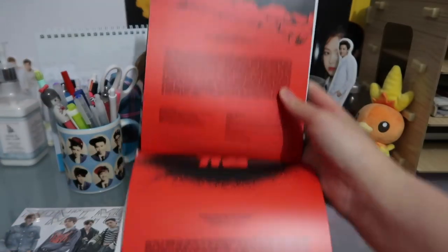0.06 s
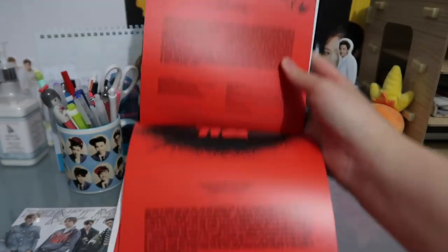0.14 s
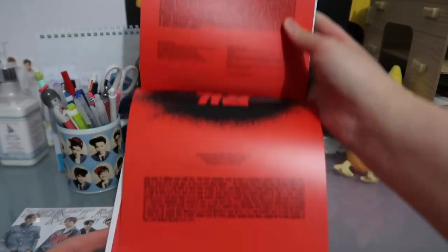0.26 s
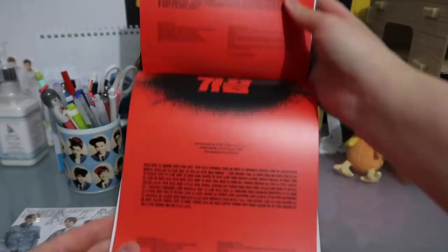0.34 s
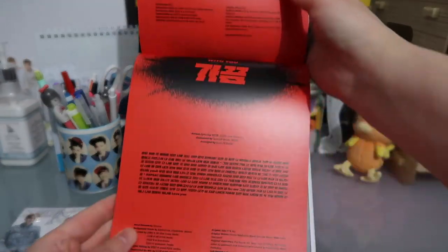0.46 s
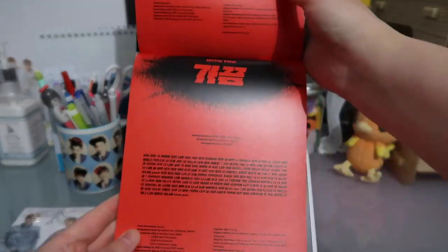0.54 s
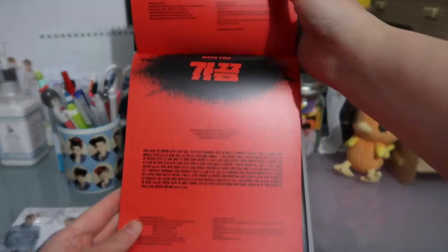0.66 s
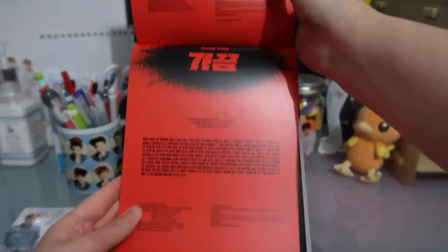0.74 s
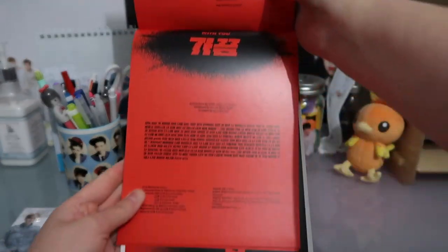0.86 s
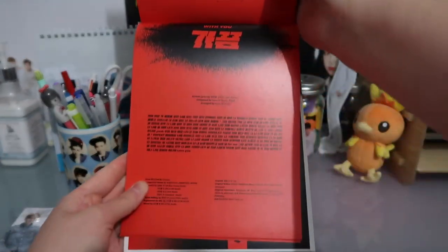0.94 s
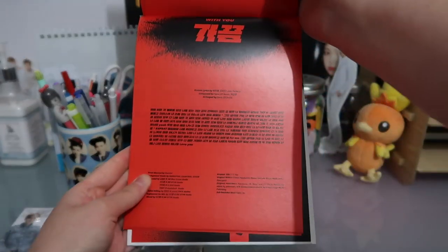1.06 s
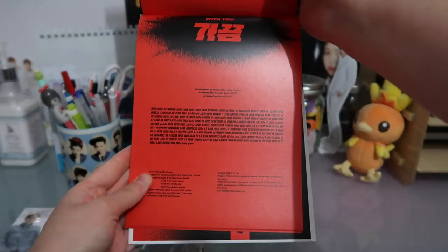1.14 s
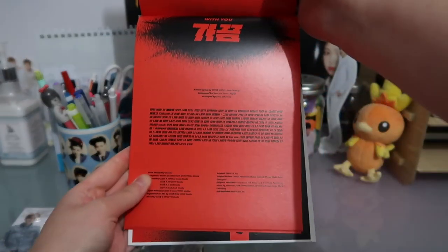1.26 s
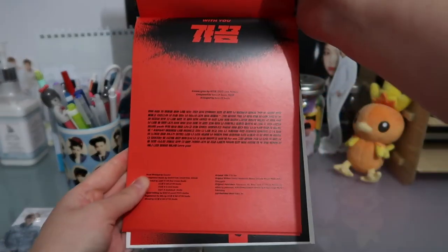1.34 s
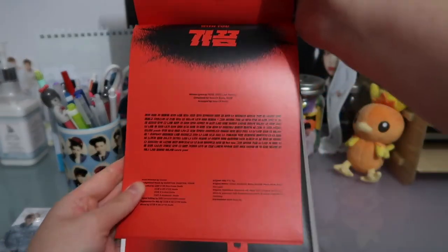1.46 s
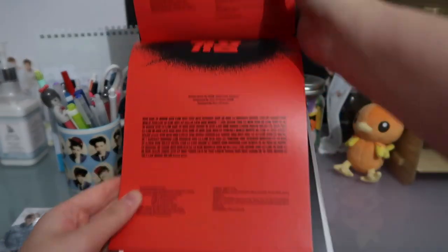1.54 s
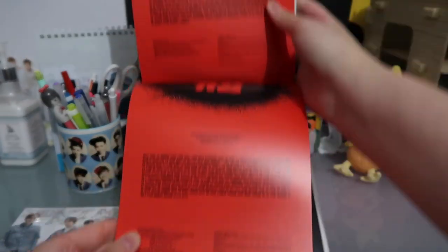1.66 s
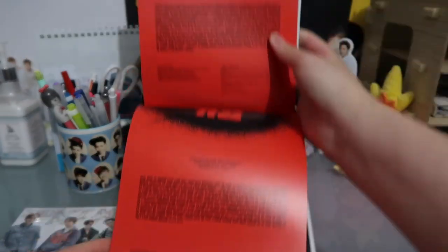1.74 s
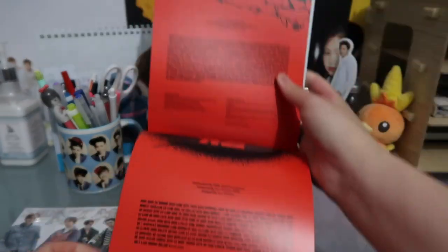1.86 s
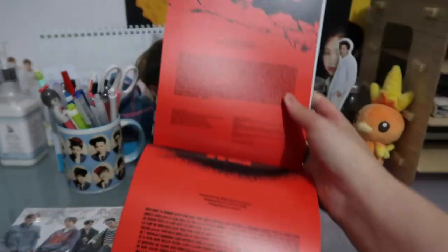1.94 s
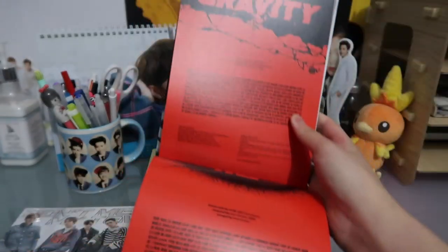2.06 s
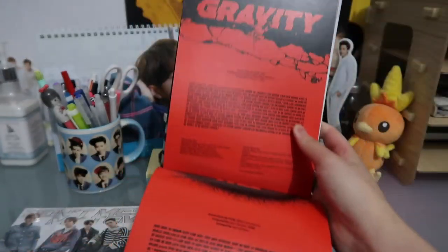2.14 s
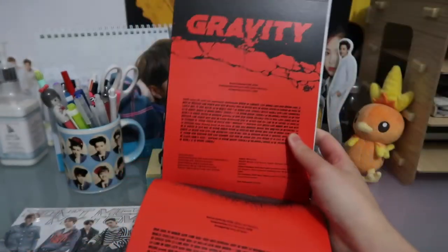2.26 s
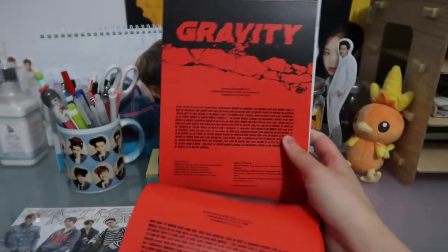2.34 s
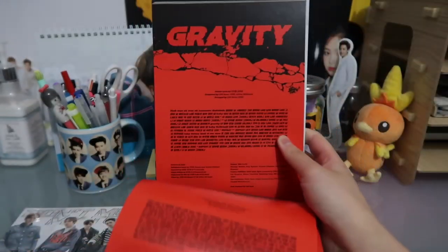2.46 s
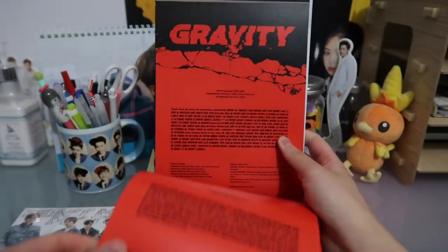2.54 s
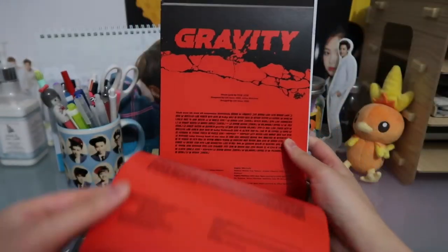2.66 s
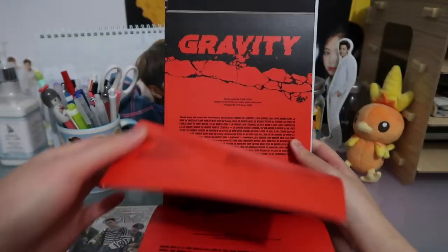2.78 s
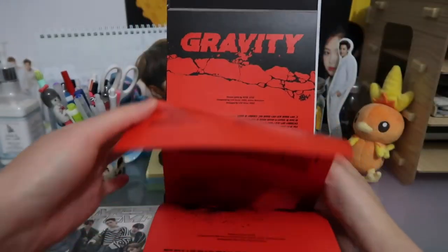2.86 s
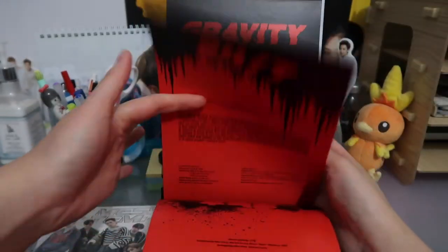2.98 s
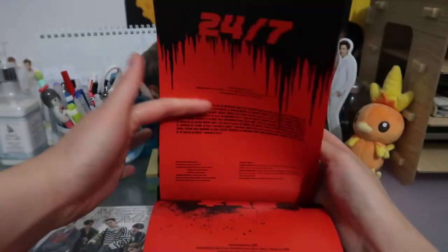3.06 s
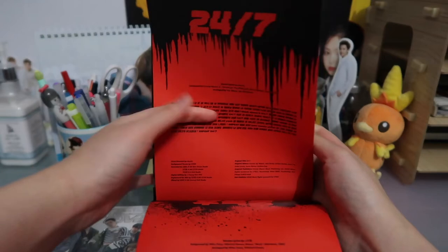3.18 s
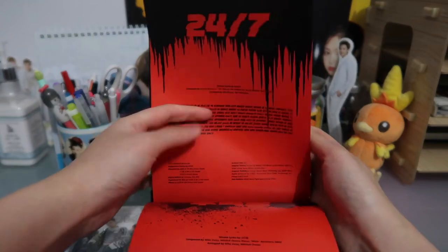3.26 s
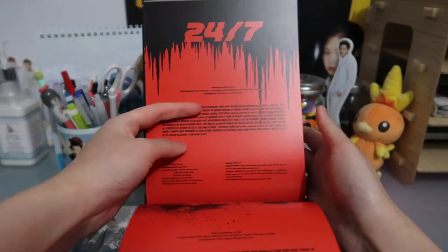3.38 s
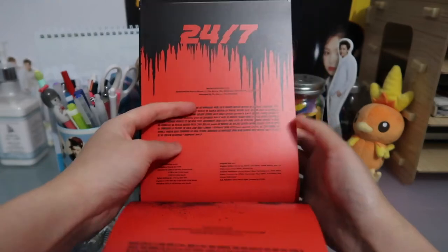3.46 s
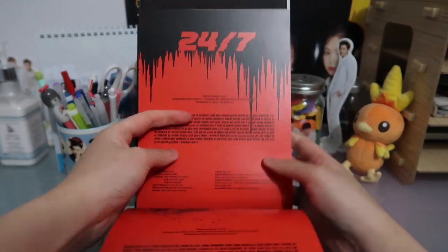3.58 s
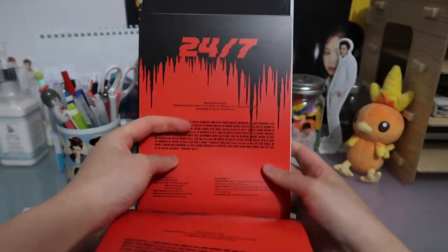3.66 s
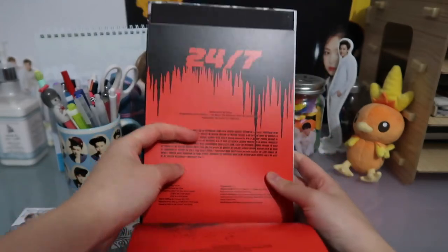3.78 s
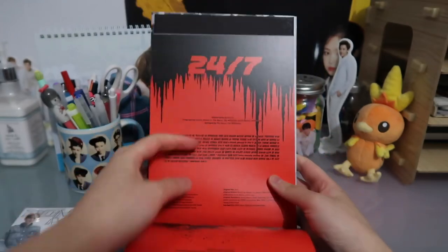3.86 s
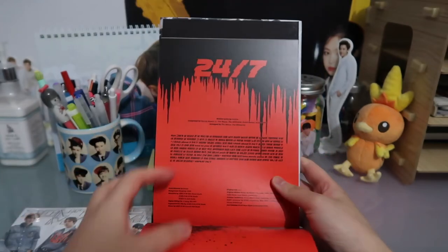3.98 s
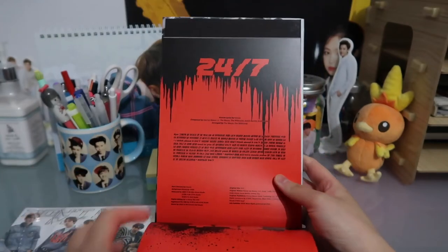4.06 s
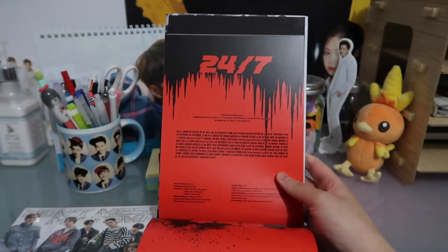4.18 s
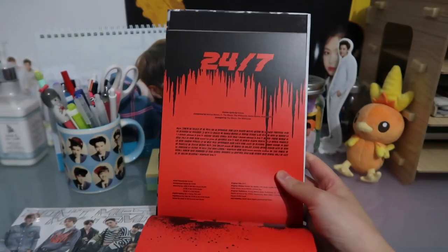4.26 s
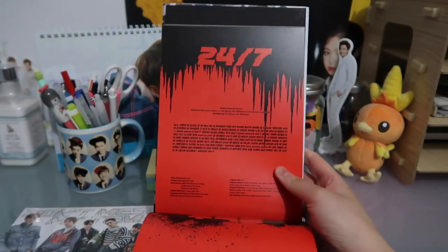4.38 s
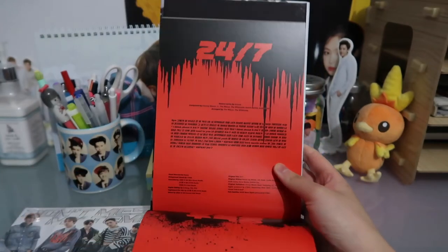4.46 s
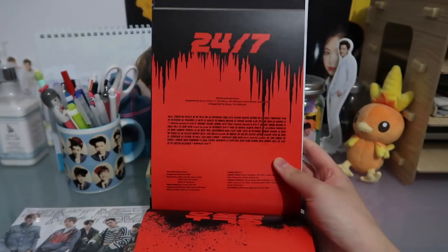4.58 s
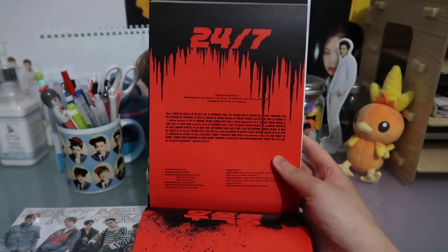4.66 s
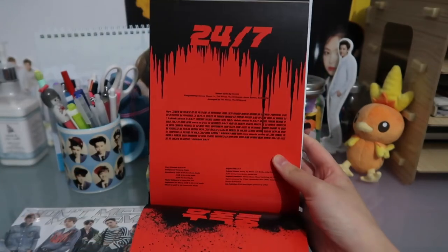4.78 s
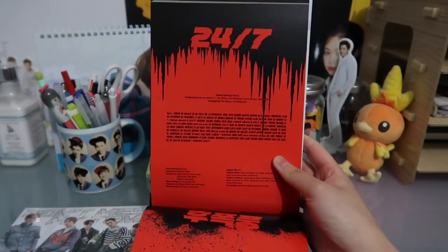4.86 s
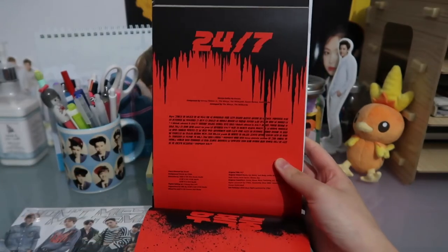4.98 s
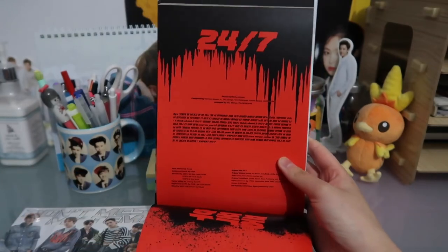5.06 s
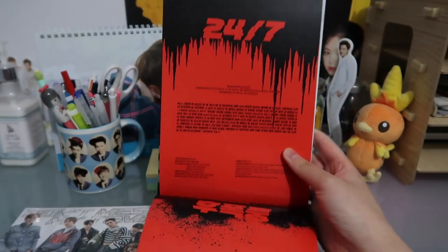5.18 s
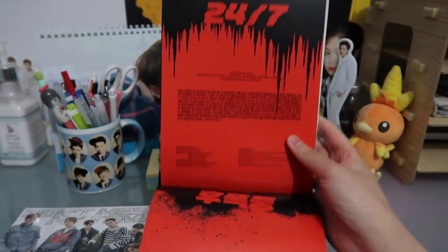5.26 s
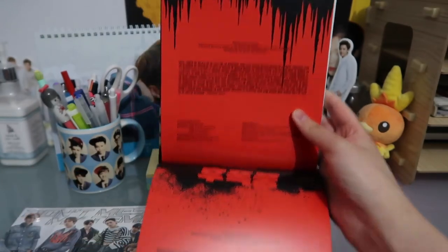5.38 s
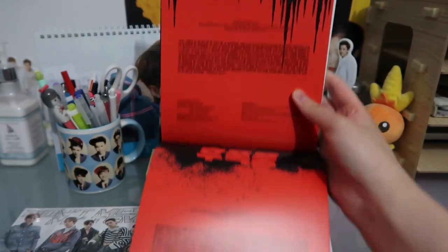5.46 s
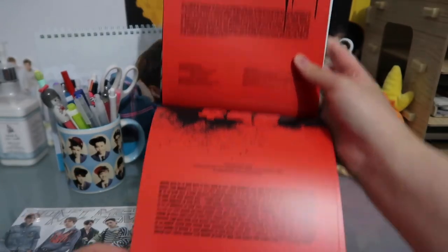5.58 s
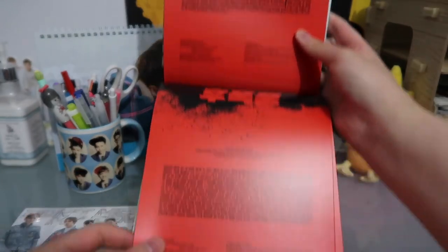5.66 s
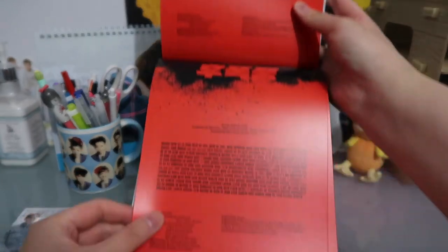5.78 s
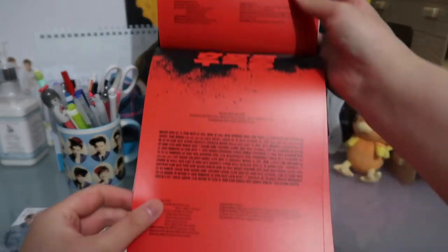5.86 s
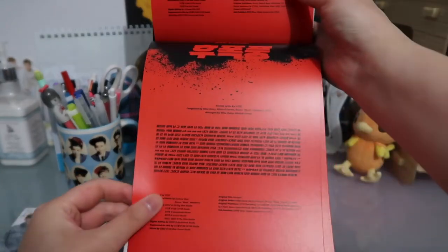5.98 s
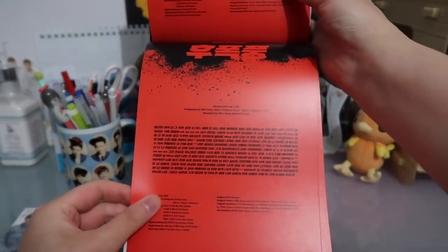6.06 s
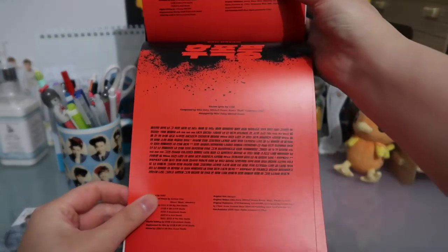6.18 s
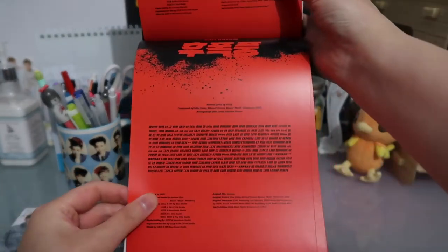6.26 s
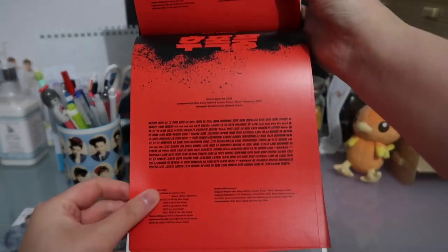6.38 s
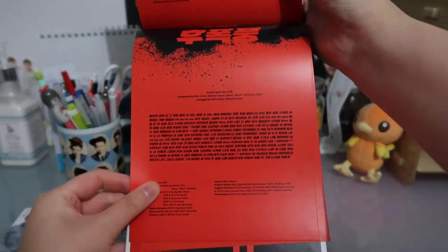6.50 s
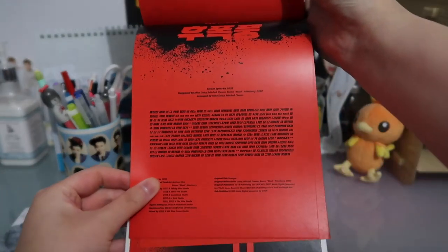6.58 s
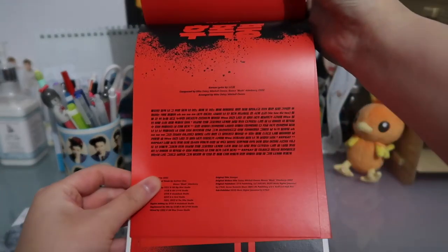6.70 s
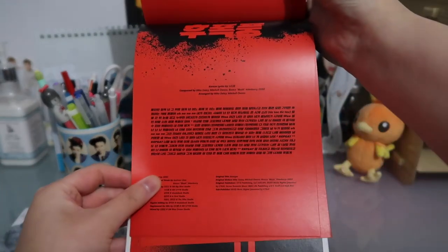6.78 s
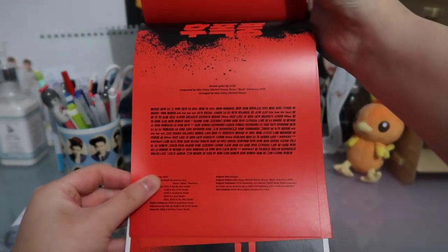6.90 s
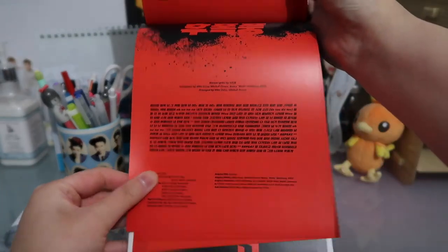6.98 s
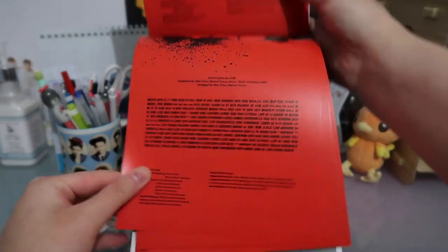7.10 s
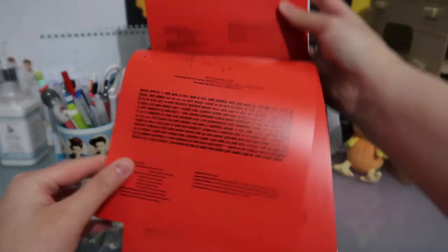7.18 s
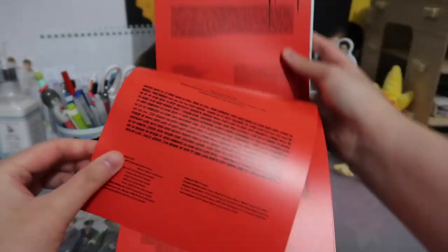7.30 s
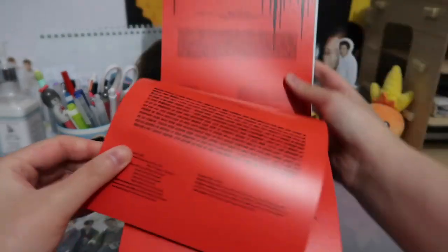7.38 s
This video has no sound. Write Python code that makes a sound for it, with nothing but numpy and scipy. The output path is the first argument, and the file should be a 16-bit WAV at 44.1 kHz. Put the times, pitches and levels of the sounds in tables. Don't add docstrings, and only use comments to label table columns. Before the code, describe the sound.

Close stereo microphones in a small quiet room with faint hiss and hum. A stiff glossy booklet is tilted with light taps and finger scrapes, then rests. Pages rustle and snap in a busy flurry, a loud edge tap on the desk follows with smaller settling taps, then near silence, a soft shift, another pause and a final crisp page turn.

```python
import sys
import numpy as np
from scipy import signal
from scipy.fft import rfft, irfft
from scipy.io import wavfile
from scipy.ndimage import uniform_filter1d

SR = 44100
rng = np.random.default_rng(int(sys.argv[2]) if len(sys.argv) > 2 else 0)


def attenuation_scalar(level_db):
    decades = np.asarray(level_db, float) / 20
    return 10 ** decades


def to_wav(s):
    ch = np.atleast_2d(s).T
    pcm = np.round(np.clip(ch, -1, 1) * 32767)
    wavfile.write(sys.argv[1], SR, pcm.astype(np.int16))


N = 328104

# (frequency [Hz], density [dB per Hz])
HISS_SPECTRUM = [(12, -46), (20, -18), (44, -3), (70, -16.5), (101, -2.5), (126, -8), (289, -7), (439, -10),
                 (478, -13.5), (649, -15), (725, -14.5), (3170, -22), (13100, -38.5), (13700, -62)]
# (frequency [Hz], left-right likeness [-1 to 1])
HISS_LIKENESS = [(60, 1), (150, 0.69), (380, -0.23), (950, -0.041), (2380, 0.048), (5980, -0.17),
                 (15000, 0.57)]
# (frequency [Hz], level [dB], phase by which left leads [rad])
HUM_TONES = [(50, -71, 0), (100, -67, 0), (13000, -77, 2.15), (13025, -77.5, 2.15), (12975, -88, 2.1),
             (13050, -87, 2)]
# (time [s], length [s], level [dB])
PUFFS = [(.005, .1, -49), (0.14, 0.063, -52), (0.225, 0.098, -51.5), (1.547, 0.032, -44),
         (1.583, 0.16, -54.5), (2.164, 0.16, -53), (2.329, 0.067, -44.5), (2.481, 0.071, -43.5),
         (2.59, .12, -49), (2.772, 0.07, -49.5), (2.92, 0.15, -47), (3.081, 0.097, -45),
         (3.142, 0.063, -47), (3.29, 0.063, -49), (3.764, 0.056, -47), (3.991, 0.044, -45.5),
         (4.133, .2, -56), (5.54, 0.44, -59), (3.348, 0.19, -54), (7.079, 0.054, -49), (7.198, 0.15, -52.5)]
# (frequency [Hz], level [dB], decay T60 [s])
DESK_MODES = [(266, 6, 0.12), (370, -8, 0.21), (503.4, 1.5, 0.084), (538, 2, 0.095), (602.6, -4, 0.062),
              (924, 2, 0.03), (1167, -1, 0.043), (1400, -15, 0.02), (1717, -9.5, 0.072),
              (2160, -18.5, 0.11), (2745, -20, 0.082)]
# (frequency [Hz], level [dB])
CARD_SPECTRUM = [(200, -20), (500, -6), (1100, 3), (2000, -11.5), (4000, -20.5), (8000, -37), (15000, -44)]
# (frequency [Hz], decay T60 [s])
CARD_T60 = [(200, 0.064), (600, 0.15), (1500, 0.096), (4000, 0.064), (10000, 0.049)]
# (time [s], peak [dB], thump [dB], snap [dB])
TAPS = [(0.015, -22, -11.5, -22), (0.081, -28.5, -11.5, -24), (0.137, -35, 5, -8),
        (0.162, -20, -11.5, -18.5), (0.226, -41, -15, -31), (0.247, -34, -16, -38),
        (0.315, -34.5, -19, -34), (0.59, -42.5, -15, -14), (0.646, -42.5, -13, -23), (3.76, -9.5, -15, -16),
        (3.811, -22, -12.5, -19), (3.846, -25.5, -10, -32), (3.855, -25.5, -10.5, -23.5),
        (4.001, -23.5, -15, -24), (4.048, -34.5, -13, -19), (4.142, -29.5, -11, -22), (4.158, -32, -8, -30),
        (4.2, -42, -17, -42), (4.275, -33.5, -7, -21.5), (4.386, -33.5, -7, -23), (4.452, -30.5, 1, -16),
        (4.523, -35, -23, -29), (4.574, -44.5, -25, -33), (4.62, -42.5, -29, -40), (4.682, -43, -28, -41),
        (4.76, -21.5, -17, -17.5), (5.039, -38, -27, -44), (5.146, -32, -13.5, -16),
        (5.585, -43.5, -1, -27)]
# (time [s], peak [dB], thump [dB], snap [dB])
SNAPS = [(1.553, -31.5, -45, -40), (1.597, -31, -44, -5), (1.649, -33, -23, -11), (1.884, -28.5, -16, -24),
         (1.971, -29, -26, -18), (2.169, -26.5, -5, -9), (2.203, -34.5, -17, -37), (2.242, -34, -17, -29),
         (2.35, -34.5, -11, -14), (2.496, -22, -10.5, -16.5), (2.601, -20.5, -19.5, -26),
         (2.624, -27, -16, -18), (2.669, -23, -16, -14.5), (2.774, -33.5, -23, -24),
         (2.799, -23.5, -23, -15), (2.965, -23, -7.5, -1), (3.001, -22.5, -19, -4), (3.027, -33, -13, -3),
         (3.111, -22.5, -16, -22), (3.132, -27.5, -11, -20), (3.303, -26.5, -15, -35),
         (3.344, -38, -20, -16), (3.389, -33, -22, -4), (5.762, -30, -7.5, -10), (7.165, -31, -30, -10),
         (7.193, -34, 1, -1.5)]
# (time [s], length [s], effort [dB], hiss
# [dB], air pocket [Hz])
SLIDES = [(0.017, 0.11, -59, 0.5, 5830), (0.207, 0.088, -60, 5, 1930), (0.31, 0.09, -59.5, -0.5, 1250),
          (0.392, .14, -52.5, -1.5, 2960), (0.498, 0.15, -61.5, -6, 1520), (1.152, 0.12, -59, -36, 1310),
          (3.388, 0.079, -53.5, -1, 2660), (4.11, 0.26, -71, 4.5, 8100), (4.516, 0.053, -55, -1, 1120),
          (4.592, 0.12, -69, 3, 1240), (5.626, 0.088, -55.5, 3, 1920), (5.682, 0.071, -56, 0, 3430),
          (5.749, 0.04, -49, -7, 1320), (5.832, .07, -66.5, 1, 1900),
          (1.544, 0.12, -52.5, -6.5, 1310), (1.639, 0.077, -48.5, -16, 1780), (1.687, 0.16, -63.5, -5, 1620),
         (1.873, .1, -54, -6.5, 1350), (1.952, 0.051, -50, -2, 1400), (2.04, 0.14, -52.5, -1, 1750),
         (2.136, 0.094, -49.5, 0.5, 1580), (2.232, 0.043, -46.5, -7.5, 3190),
         (2.269, 0.088, -52.5, -7, 1640), (2.338, 0.075, -50, -4, 1560), (2.38, 0.26, -52, -6, 1450),
         (2.59, 0.086, -50, -8, 1250), (2.79, 0.087, -47, -4.5, 1400), (2.861, 0.23, -42, -8, 1550),
         (3.025, 0.11, -53.5, 1, 1450), (3.11, 0.1, -48, -19, 2850), (3.17, 0.12, -50.5, -9, 3940),
         (3.296, 0.13, -53.5, -23, 1430), (7.062, 0.069, -52, 1, 6400), (7.099, 0.072, -47, 0.5, 6460),
         (7.184, 0.04, -52, 0, 5600), (7.208, .08, -43.5, -9, 3660), (7.242, 0.17, -50.5, -3.5, 2980),
         (7.32, 0.19, -54, -6.5, 2820)]
# (frequency [Hz], density [dB per Hz])
SLIDE_SPECTRUM = [(530, -14), (900, -1.5), (1290, -2), (1930, -4), (2890, -7.5), (3180, -12), (3500, -9),
                  (5370, -22), (11800, -32.5), (15500, -48)]
# (frequency [Hz], bandwidth [Hz], level [dB])
SHEET_MODES = [(270, 50, 12.5), (503, 240, 3), (1080, 180, 14.5), (1230, 67, 0), (1750, 50, 8.5)]
# (time [s], peak [dB])
TICKS = [
    (2.774, -37),
    (3.673, -31.5),
]
# (frequency [Hz], left-right likeness [clipped to -1 to 1])
NEAR_LIKENESS = [(100, 1), (600, 1), (1500, 1), (3000, .88), (7000, .5), (14000, -2.1)]


def read_curve(points, hz):
    f, value = np.transpose(points)
    return np.interp(np.log(hz + 1), np.log(f + 1), value)


def evened(x):
    return x / np.sqrt(np.mean(x ** 2) + 1e-20)


def add(mix, s, sound):
    part = mix[round(s * SR):][:len(sound)]
    part += sound[:len(part)]


def coloured(x, points):
    gain = attenuation_scalar(read_curve(points, np.fft.rfftfreq(len(x), 1 / SR)))
    return irfft(rfft(x) * gain, len(x))


def resonate(x, hz, width):
    turn = np.exp(2j * np.pi * np.cumsum(hz * np.ones(len(x))) / SR)
    r = np.exp(-np.pi * width / SR)
    smoothed = signal.lfilter([1 - r], [1, -r], x / turn + 1e-18)
    return 2 * (turn * smoothed).real


def grains(per_s, spread_db):
    clumps = evened(uniform_filter1d(uniform_filter1d(rng.standard_normal(N), 300), 300))
    size_db = spread_db * np.minimum(rng.exponential(1, N), 5)
    size = attenuation_scalar(size_db) * rng.choice([-1, 1], N)
    catches = evened(size * (rng.random(N) < per_s / SR))
    noise = 0.52 * rng.standard_normal(N)
    return evened((catches + noise) * attenuation_scalar(1.44 * clumps))


def arch(length, db):
    u = np.arange(0, 1, 1 / (SR * length))
    return attenuation_scalar(db) * np.sin(np.pi * u ** 0.8)


def floor():
    frames, hz = N // 512 + 6, np.fft.rfftfreq(2048, 1 / SR)
    a, b, c, d, patches = rng.standard_normal((frames, len(hz), 5)).T
    patches = evened(uniform_filter1d(uniform_filter1d(patches, 24, 0), 6, 1))
    same = read_curve(HISS_LIKENESS, hz)[:, None]
    left = a + 1j * b
    right = same * left + np.sqrt(1 - same ** 2) * (c + 1j * d)
    level_db = read_curve(HISS_SPECTRUM, hz)[:, None] + 0.3 * patches
    z = np.array([left, right]) * attenuation_scalar(level_db) / np.sqrt((1 + same) / 2)
    hiss = signal.istft(z, nperseg=2048, noverlap=1536)[1][:, :N]
    t = np.arange(N) / SR
    hum = np.zeros((2, N))
    for f, db, lead in HUM_TONES:
        hum += np.sqrt(2) * attenuation_scalar(db) * np.sin(2 * np.pi * f * t + np.array([[lead], [0]]))
    return attenuation_scalar(-56 - 0.47) * hiss / np.std(hiss.mean(0)) + attenuation_scalar(0.3) * hum


def puffs():
    air = coloured(grains(300, 2.65),
                   [(30, -41), (70, 0), (150, -0.5), (300, -8), (500, -3.5), (1000, -78)])
    air = evened(air) + 0.71 * evened(resonate(air, 293, 30))
    push = np.zeros(N)
    for s, length, db in PUFFS:
        add(push, s, arch(length, db))
    return attenuation_scalar(-1.0) * push * air


def knock(peak_db, thump_db, snap_db):
    modes, blow_ms = 100, 2.885
    t = np.arange(3000, dtype=np.float32)[:, None] / SR
    draw = rng.random((modes, 3))
    card_hz = 250 * 56 ** (((np.arange(modes) + draw[:, 0]) / modes) ** 0.7)
    desk_hz, desk_db, desk_t60 = np.transpose(DESK_MODES)
    count = len(desk_hz)
    hz = np.r_[desk_hz * (0.98 + 0.04 * draw[:count, 1]), card_hz]
    card_db = read_curve(CARD_SPECTRUM, card_hz) - 9 - 6 * draw[:, 1]
    db = np.r_[desk_db - 4 * draw[:count, 0], card_db]
    colour = [(300, thump_db + 9), (530, 0.45 * thump_db + 5), (1100, 0), (4000, snap_db + 27)]
    db += read_curve(colour, hz)
    t60 = 0.98 * np.r_[desk_t60, read_curve(CARD_T60, card_hz)]
    phase = 2 * np.pi * np.resize(draw[:, 2], len(hz))
    onset = 1 - np.exp(-t * hz / 0.39)
    rings = (attenuation_scalar(db - 60 * t / t60) * np.sin(2 * np.pi * hz * t + phase) * onset).sum(1)
    rings *= 1 + attenuation_scalar(4 - 60 * t[:, 0] / 0.012)
    contacts = np.zeros(900)
    contact_s = draw[:4, 2] * draw[:4, 1] * blow_ms / 1000
    contacts[(contact_s * SR).astype(int)] = 0.44 * (1 - draw[:4, 0])
    contacts[0] = 1
    sound = signal.fftconvolve(rings, contacts)
    return attenuation_scalar(peak_db) * sound / abs(sound).max()


def smoothed_power(x):
    return abs(uniform_filter1d(x, 130))


def efforts():
    t = np.arange(6000) / SR
    shake_t60, shake_hiss_db, shake_hz = 0.24, -16, 1250
    parts = []
    for s, length, db, hiss_db, hz in SLIDES:
        parts.append((s, arch(length, db), hiss_db, hz, 1))
    for blows, shake_db in (SNAPS, -29), (TAPS, -33.5):
        for s, db, *_ in blows:
            shake = attenuation_scalar(db + shake_db - 60 * t / shake_t60)
            parts.append((s, shake, shake_hiss_db, shake_hz, 0))
    power = np.zeros((N, 6))
    for s, size, hiss_db, hz, pocket in parts:
        flex_db = 4.5 * np.log2(min(hz, 3000) / shake_hz)
        shares = [1, attenuation_scalar(2 * hiss_db), attenuation_scalar(2 * flex_db), pocket]
        add(power[:, :4], s, np.outer(size ** 2, shares))
        add(power[:, 4:], s, np.outer(pocket * size ** 8, [1, hz]))
    *shares, rule, hz = power.T
    pocket_hz = smoothed_power(np.clip(hz / (rule + 1e-60), 500, 8000))
    return *(np.sqrt(smoothed_power(x)) for x in shares), pocket_hz


def ridged(x):
    hz, t, z = signal.stft(x, SR, nperseg=512)
    field = rng.standard_normal(z.shape)
    bins, frames = round(170 / hz[1]), round(0.06 / t[1])
    for _ in range(2):
        field = uniform_filter1d(uniform_filter1d(field, bins, 0), frames, 1)
    return signal.istft(z * attenuation_scalar(2.8 * evened(field)), SR, nperseg=512)[1][:N]


def sliding():
    effort, hiss, flexing, trapped, pocket_hz = efforts()
    rub = ridged(coloured(grains(5000, 1.9), SLIDE_SPECTRUM))
    low = signal.sosfilt(signal.butter(4, 5300, "low", fs=SR, output="sos"), rub)
    high = signal.sosfilt(signal.butter(4, 5300, "high", fs=SR, output="sos"), rub)
    air = grains(3000, 2.0)
    pocket = evened(resonate(air, pocket_hz, 126))
    pocket += attenuation_scalar(-11) * evened(resonate(air, 2 * pocket_hz, 340))
    catches = grains(1100, 5.9)
    flex = np.zeros(N)
    for hz, width, db in SHEET_MODES:
        flex += attenuation_scalar(db) * resonate(catches, hz, width)
    direct = 1.13 * effort * evened(low) + hiss * evened(high)
    return direct + trapped * pocket + attenuation_scalar(-9.0) * flexing * evened(flex)


def tick(peak_db):
    t = np.arange(2000) / SR
    decay = attenuation_scalar(-60 * t / 0.0038) + attenuation_scalar(-13 - 60 * t / 0.07)
    burst = rng.standard_normal(len(t)) * decay
    sound = signal.sosfilt(signal.butter(1, [3500, 8000], "band", fs=SR, output="sos"), burst)
    return attenuation_scalar(peak_db) * sound / abs(sound).max()


def ports(x):
    hz, t, z = signal.stft(x, SR, nperseg=256)
    drift = uniform_filter1d(uniform_filter1d(rng.standard_normal(z.shape), 5, 0), 9, 1)
    spread = np.arccos(np.clip(read_curve(NEAR_LIKENESS, hz), -1, 1))[:, None]
    half = spread * evened(drift) / 2
    pair = np.array([z * np.exp(1j * half), z * np.exp(-1j * half)])
    return signal.istft(pair, SR, nperseg=256)[1][:, :N]


def room(x):
    length, t60 = 16100, 0.27
    at = np.arange(300, 16000, 22) + rng.integers(0, 22, (2, 714))
    echoes = np.zeros((2, length))
    np.put_along_axis(echoes, at, rng.choice([-1., 1.], at.shape), 1)
    echoes *= attenuation_scalar(-60 * np.arange(length) / SR / t60)
    echoes = signal.lfilter([1], [1, -0.6], echoes)
    echoes = echoes[0] + 0.5 * echoes[1] * [[1], [-1]]
    return signal.fftconvolve(x[None], echoes / np.linalg.norm(echoes[0]), axes=1)[:, :N]


def scene():
    near = puffs() + sliding()
    for s, *blow in SNAPS + TAPS:
        add(near, s, knock(*blow))
    for s, db in TICKS:
        add(near, s, tick(db))
    return ports(near) + attenuation_scalar(-19.5) * room(near) + floor()


def band_limit(x):
    return signal.sosfilt(signal.butter(12, 15710, fs=SR, output="sos"), x)


def record(dry):
    mix = signal.sosfilt(signal.butter(10, 14200, fs=SR, output="sos"), dry)
    return band_limit(mix)


dry = scene()
out = record(dry)
to_wav(out)
```